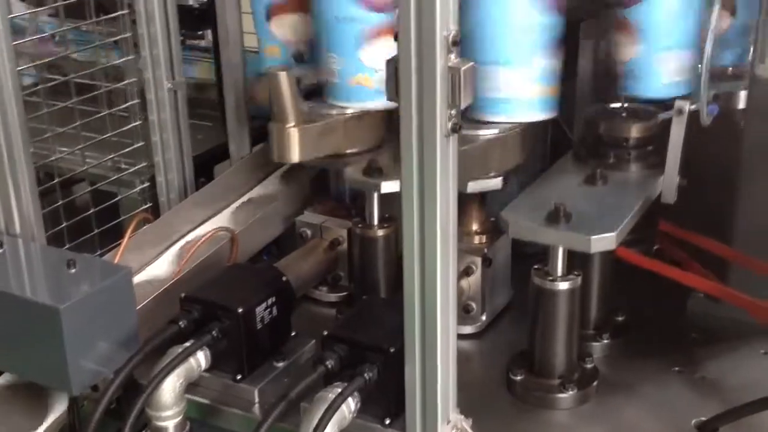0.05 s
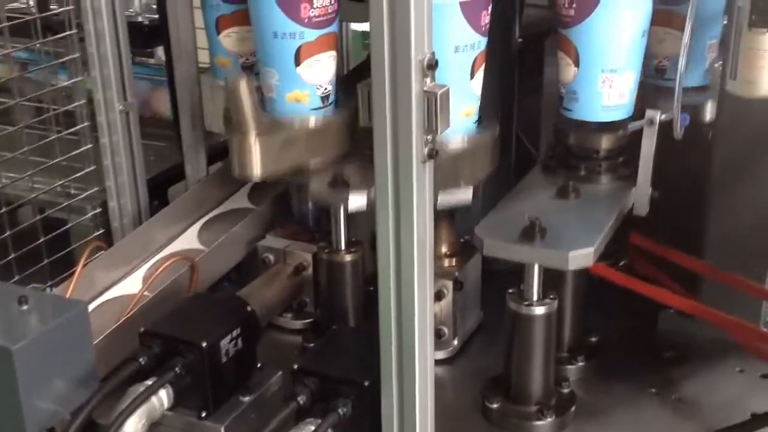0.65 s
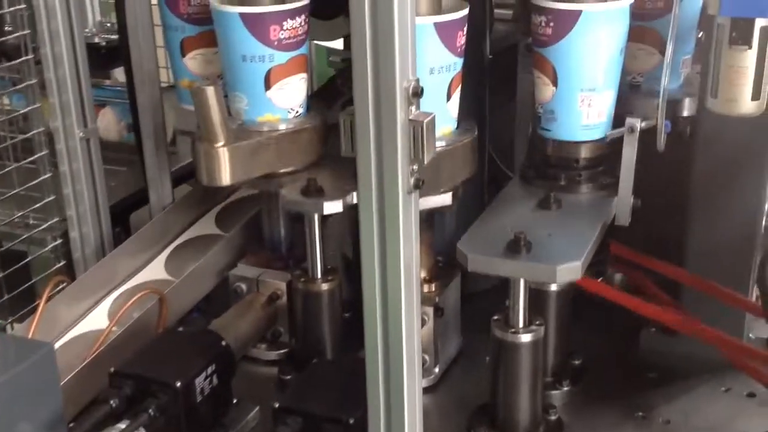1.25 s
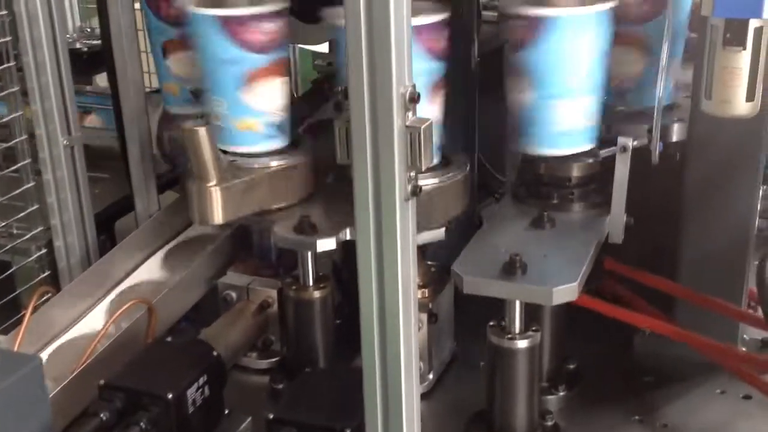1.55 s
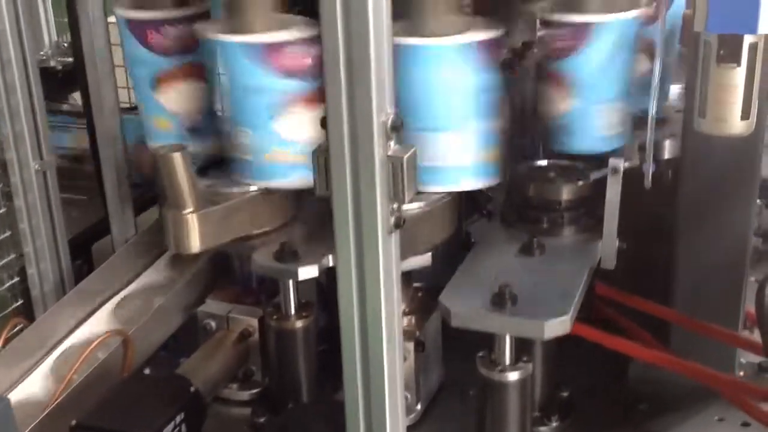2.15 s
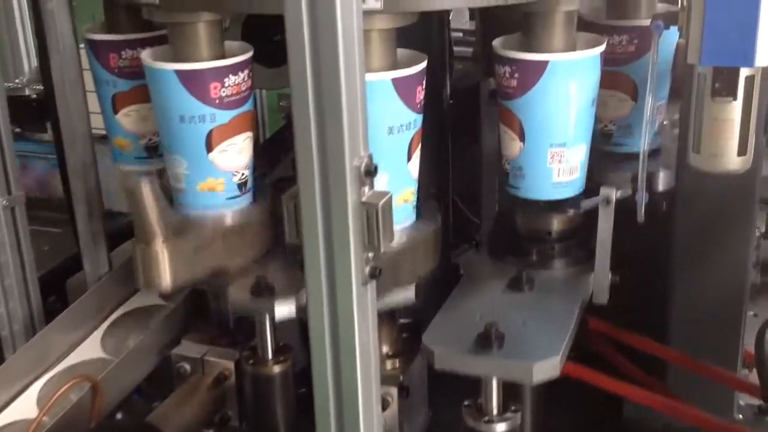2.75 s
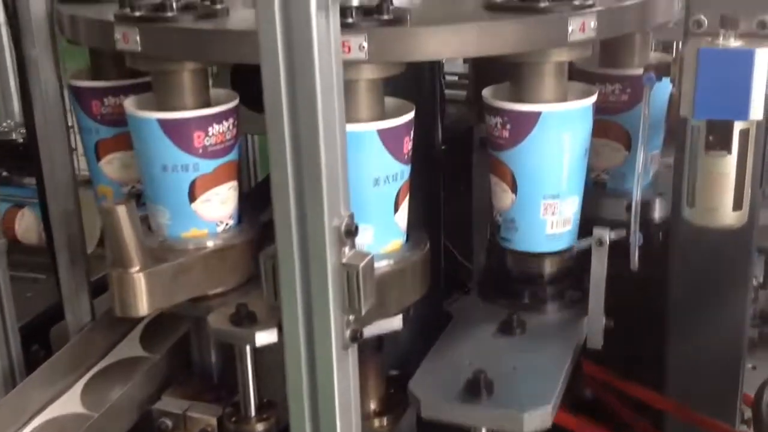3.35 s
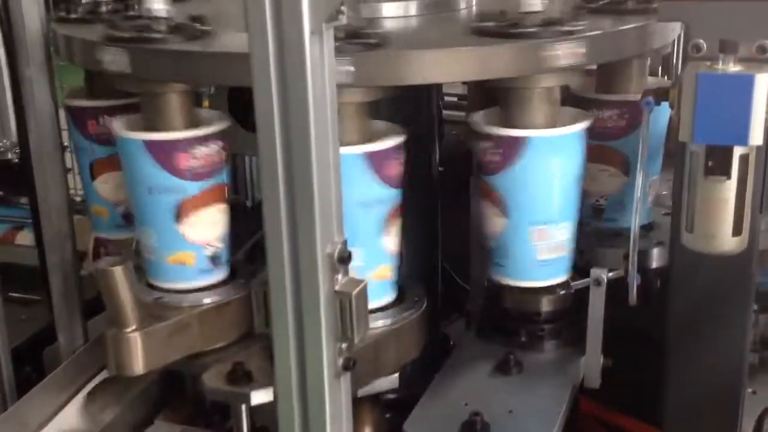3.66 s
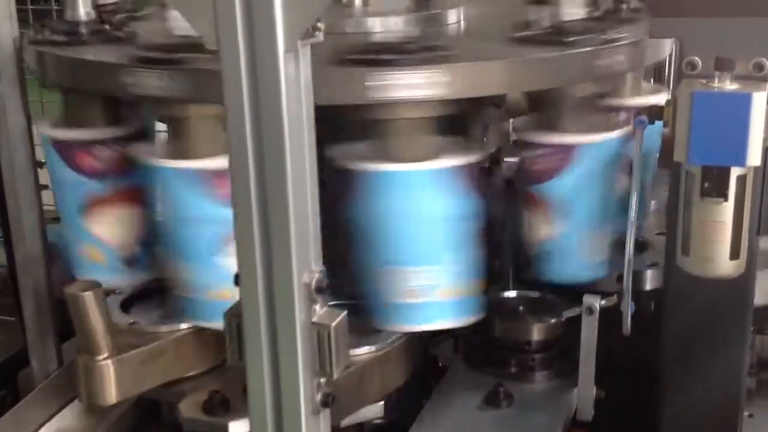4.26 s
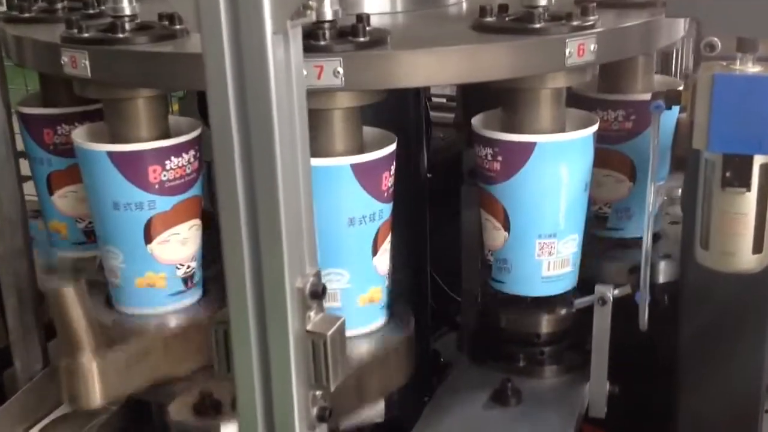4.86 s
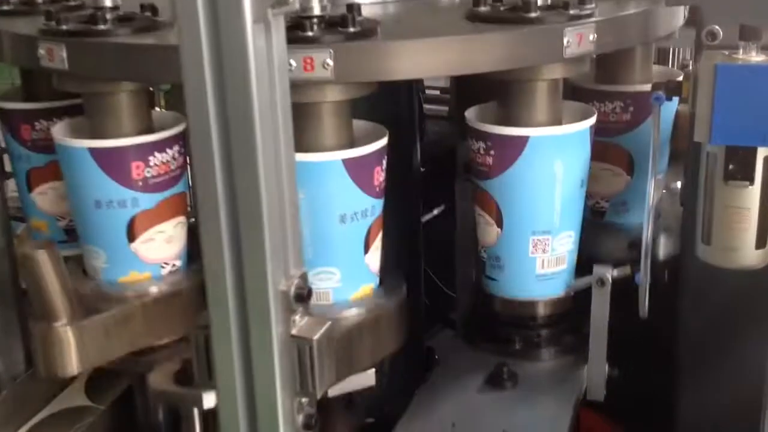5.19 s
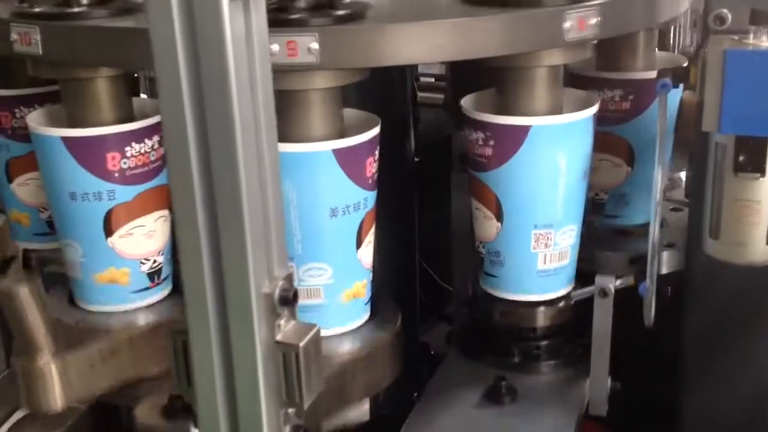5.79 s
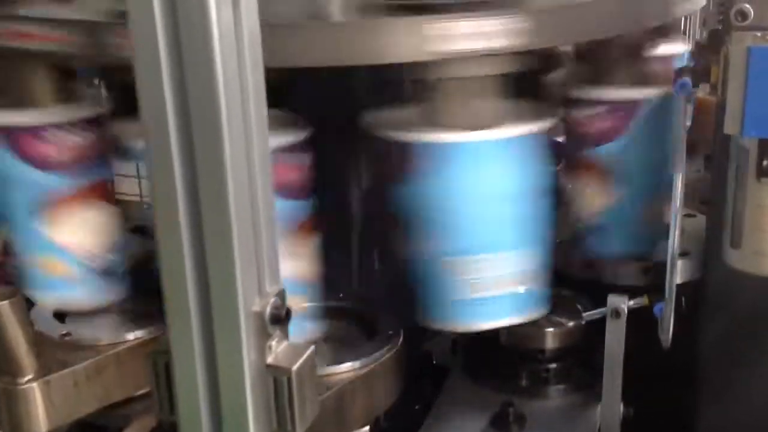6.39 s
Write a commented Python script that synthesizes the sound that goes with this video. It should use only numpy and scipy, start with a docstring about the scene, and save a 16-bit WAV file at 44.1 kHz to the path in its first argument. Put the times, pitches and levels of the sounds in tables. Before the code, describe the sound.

A paper cup forming machine runs close by for about six and a half seconds, heard in mono. The loudest sound is a piercing, extremely high squeal from its ultrasonic welder. It is sounding at the start, returns at about 0.6 seconds and repeats every 0.7 seconds, the last at 6.2. Each squeal starts sharply, holds for about a fifth of a second and rings away, pushing the other sounds down while it lasts. In every cycle a steel clamp strikes, an air jet hisses and fades, cams clack in quick clusters and a spinning tool briefly scrapes the cup. More knocks and a thinner hiss lead into the next squeal. Underneath, the drive rumbles and rattles continuously, with a faint gear hum and a thin motor whine. Short paper squeaks come now and then, around 0.3, 1.6, 3.7 and 4.4 seconds. The rhythm stays even throughout.

```python
"""A very high squeal rings out over a rumbling, clattering machine that forms paper cups, close by.
The squeal is the ultrasonic welder, which seals a seam with a vibrating metal horn every 0.7 s.
In each cycle the drive rumbles, its motor whines, air jets hiss, cams and clamps strike and a
spinning tool scrapes the cup; now and then paper squeaks. The squeal overloads the recorder,
whose limiter turns the whole clatter down until the squeal has died away. The sound is mono."""
import sys
import numpy as np
from scipy import signal
from scipy.fft import rfft, irfft, next_fast_len
from scipy.io import wavfile
from scipy.ndimage import uniform_filter1d, minimum_filter1d, map_coordinates

SR = 44100
rng = np.random.default_rng(int(sys.argv[2]) if len(sys.argv) > 2 else 0)


def wav_record(signal):
    """Record a signal, one row per channel, as 16-bit PCM in the file named by sys.argv[1]."""
    frames = np.transpose(np.atleast_2d(signal))
    bounded = np.clip(frames, -1, 1)
    # unit amplitude maps onto the largest positive 16-bit level
    quanta = np.round(bounded * 32767).astype(np.int16)
    wavfile.write(sys.argv[1], SR, quanta)


N = 283563
CYCLE_S = 0.6982


def amp(db):
    """Turn decibels into a number to multiply a sound by."""
    return 10 ** (np.asarray(db) / 20)


def unit(x):
    """Scale a sound so that its average strength (rms) is 1."""
    return x / np.sqrt(np.mean(np.abs(x) ** 2) + 1e-20)


def wobble(per_s):
    """A smooth curve that passes through per_s random values each second."""
    points = rng.standard_normal(int(N * per_s / SR) + 4)
    return map_coordinates(points, [np.arange(N) * per_s / SR])


def colour(x, spectrum, resonances=()):
    """Make some pitches of a sound stronger and others weaker, then scale it to strength 1."""
    size = next_fast_len(N + 8192)
    hz = np.fft.rfftfreq(size, 1 / SR)
    points_hz, points_db = np.transpose(spectrum)
    level_db = np.interp(np.log(hz + 1), np.log(points_hz), points_db)
    for pitch_hz, width_hz, boost_db in resonances:
        level_db += boost_db / (1 + (2 * (hz - pitch_hz) / width_hz) ** 2)
    return unit(irfft(rfft(x, size) * amp(level_db), size)[:N])


def pitched_noise(pitch_hz, width_hz, samples):
    """Noise through one resonance: the narrower it is, the more it sounds like a note."""
    pole = np.exp((2j * np.pi * pitch_hz - np.pi * width_hz) / SR)
    ringing = signal.lfilter([1], np.poly([pole, pole]), rng.standard_normal(samples + SR // 8))
    return unit(ringing.real[-samples:])


def add(out, start_s, x):
    """Mix the sound x into out, beginning at start_s."""
    start = round(start_s * SR)
    first, last = max(start, 0), min(start + len(x), N)
    if last > first:
        out[first:last] += x[first - start:last - start]


def current_cycle():
    """The columns of the cycle table, each value held for as long as its cycle lasts."""
    rows = np.array(CYCLES)
    started = np.searchsorted(rows[:, 0], np.arange(N) / SR, side="right")
    return rows[np.maximum(started - 1, 0)].T


def cycle_time():
    """Seconds since the welder last fired."""
    return np.arange(N) / SR - current_cycle()[0]


def cam(opens_s, length_s, ramp_s):
    """A cam is a shaped wheel: once a cycle it moves a part from off (0) to on (1) and back."""
    since_s = (cycle_time() - opens_s) % CYCLE_S
    return np.clip(np.minimum(since_s, length_s - since_s) / ramp_s, 0, 1)


# One row for each machine cycle, which starts as the welder fires. The dB values raise or lower a sound.
# start_s, clamp_lag_s, clamp_db, chatter_db, squeal_db, cup_knock_db
CYCLES = [(-.077, .001, -7, 0, 0, -10), (.6215, 0.00081, .5, 1, 0, -5), (1.3196, 0, 1.5, 6, -1, 2),
          (2.0166, .004, 6.5, 3, 0, -5), (2.7151, 0.011, 3.5, 1, -1.5, 5), (3.413, 0, 2, 2, 0, 2),
          (4.1128, 0.00041, -2.5, -3, -0.5, 1), (4.8106, 0.0042, 0, -3, -0.5, -4),
          (5.5113, 0.0013, -2.5, -3, 1, 1.5), (6.2058, 0.0071, 3, 1, 0, -4)]
# The horn's weaker side tones, relative to its squeal: pitch_hz, level_db, width_hz
CHATTER_TONES = [(14572, -22, 16), (14787, -22, 16), (15221, -19, 16), (11208, -29, 260)]


def welder(pitch_hz=15005, flat_hz=55, settle_s=0.05, weld_db=2.5, attack_s=0.0024, weld_s=0.18,
           drop_db=8, drop_s=0.06, fade_db_per_s=69):
    """The horn squeals at a fraction of its ultrasonic pitch, starting flat and pulling up to tune."""
    since_s = cycle_time()
    _, _, _, chatter_db, squeal_db, _ = current_cycle()
    # each weld starts with a surge; at its end the squeal drops and rings away
    surge_db = 2.5 * np.exp(-(since_s / 0.063) ** 4)
    after_s = np.maximum(since_s - weld_s, 0)
    fade_db = drop_db * np.minimum(after_s / drop_s, 1) + fade_db_per_s * after_s
    loudness = np.minimum(since_s / attack_s, 1) * amp(weld_db + squeal_db + surge_db - fade_db)
    hz = pitch_hz - flat_hz * np.exp(-since_s / settle_s) + 4 * wobble(25)
    whistle = np.sqrt(2) * np.sin(2 * np.pi * np.cumsum(hz) / SR)
    beating = amp(2.5 * wobble(45))  # reflections make the level waver
    horn = whistle * beating + 0.29 * pitched_noise(pitch_hz, width_hz=100, samples=N)
    # the horn chatters while it is pressed on the paper
    pressed = cam(opens_s=0.047, length_s=0.174, ramp_s=0.034) * amp(chatter_db)
    chatter = sum(amp(level_db + 1.4 * wobble(16)) * pitched_noise(side_hz, width_hz, N)
                  for side_hz, level_db, width_hz in CHATTER_TONES)
    return loudness * (horn + pressed * chatter)


def drive_load(swing_db=2, peak_s=0.69):
    """How hard the drive works, in dB: it swings once a cycle and peaks as the press closes."""
    return swing_db * np.cos(2 * np.pi * (cycle_time() - peak_s) / CYCLE_S)


def contacts(per_s, spread_db=3):
    """A dense hail of tiny taps of uneven size."""
    happens = rng.random(N) < per_s / SR
    size = amp(spread_db * rng.standard_normal(N))
    return happens * size * rng.choice([-1, 1], N)


def steel_parts(taps_per_s, ring_s, parts):
    """Loose steel parts ring at every tap, each in its own way, fading by 60 dB in ring_s."""
    t = np.arange(SR // 10) / SR
    rings = rng.standard_normal((parts, len(t))) * amp(-60 * t / ring_s)
    return sum(signal.fftconvolve(contacts(taps_per_s), ring)[:N] for ring in rings)


# Pitches at which the machine's frame resonates: pitch_hz, width_hz, boost_db
FRAME_RESONANCES = [(179, 84, 3.5), (239, 36, 4), (322, 83, 5), (402, 66, 3.5), (464, 34, -1.5),
                    (556, 32, 2.5), (603, 63, 2), (830, 110, 3), (1240, 330, -0.5), (1910, 950, 0.5),
                    (2790, 290, 1)]
# The deep tone of the shaking frame: pitch_hz, relative_db
RUMBLE_SPECTRUM = [(25, -54), (65, -49), (100, -10.5), (135, -11), (175, -1.5), (300, -2), (600, 0),
                   (950, -3.5), (1300, -12.5), (3000, -26), (16000, -70)]
# The bright tone of small rattling parts: pitch_hz, relative_db
RATTLE_SPECTRUM = [(100, -36), (600, -5), (1200, 0), (2200, .5), (3500, -1), (6500, -0.5), (8000, -4.5),
                   (11000, -9), (14000, -13.5), (15300, -3), (15800, -45)]


def drive(rumble_db=-25, rattle_db=-20, links_per_s=30, link_db=1):
    """Cams, chains and gears shake the frame: it rumbles with the load while small parts rattle."""
    load_db = drive_load()
    # chain links drop onto their toothed wheel, so the rumble pulses
    pulse_db = link_db * np.cos(2 * np.pi * links_per_s * cycle_time())
    rumble = colour(contacts(per_s=2500), RUMBLE_SPECTRUM, FRAME_RESONANCES)
    rumble *= amp(rumble_db + load_db + pulse_db + 0.78 * wobble(22))
    loose_parts = steel_parts(taps_per_s=500, ring_s=0.042, parts=6)
    rattle = colour(loose_parts, RATTLE_SPECTRUM, FRAME_RESONANCES)
    rattle *= amp(rattle_db + 0.071 * load_db + 0.5 * wobble(70))
    return rumble + rattle


def tone(pitch_hz, wander_hz, flutter_db):
    """A pure note of strength 1, slightly unsteady in pitch and level."""
    turns = np.cumsum(pitch_hz + wander_hz * wobble(14)) / SR
    return unit(np.sin(2 * np.pi * turns) * amp(flutter_db * wobble(18)))


# How the motor's whine rises and falls in level: time_s, relative_db
WHINE_LEVELS = [(0.27, -28), (0.51, -29), (0.97, -29), (1.21, -25.5), (1.67, -32), (1.91, -37),
                (2.369, -42), (2.61, -32.8), (3.069, -27), (3.31, -27), (3.76, -30), (4.0, -28.5),
                (4.46, -35), (4.7, -36), (5.16, -36), (5.4, -29), (5.86, -34.3), (6.101, -29.7)]
# The notes of gear teeth meeting, at middle load: pitch_hz, level_db
GEAR_TONES = [(495, -34), (990, -40), (522, -39)]


def motors(whine_hz=4117, whine_boost_db=0.5, load_follow=0.99):
    """The motor's power supply (an inverter) whines, and the hum of the gears swells with the load."""
    whine_db = np.interp(np.arange(N) / SR, *np.transpose(WHINE_LEVELS)) + whine_boost_db
    whine = amp(whine_db) * tone(whine_hz, wander_hz=3.9, flutter_db=2)
    gears = sum(amp(level_db) * tone(pitch_hz, wander_hz=2.97, flutter_db=4)
                for pitch_hz, level_db in GEAR_TONES)
    return whine + amp(load_follow * drive_load()) * gears


# The broad hiss of the blow-off jet: pitch_hz, relative_db
BLOW_OFF_SPECTRUM = [(200, -55), (1500, -0.5), (3500, 0), (5500, 3.5), (7200, 3.5), (9000, -3), (13000, 2),
                     (15000, 2), (15700, -45)]
# The thinner hiss of the transfer jet and the leak: pitch_hz, relative_db
TRANSFER_SPECTRUM = [(500, -34), (4000, -8), (7500, 3.5), (9900, -1), (10500, -7.5), (15000, -10),
                     (15800, -50)]


def air_jets(blow_db=-14, opens_s=0.19, ramp_s=0.039, sag_db_per_s=55, transfer_db=-26, leak_db=-38):
    """Two air valves open in turn over a steady leak; the blow-off jet fades as its pressure sags."""
    since_s = (cycle_time() - opens_s) % CYCLE_S
    sag_db = sag_db_per_s * np.maximum(since_s - ramp_s, 0)
    pressure = amp(blow_db - sag_db + 2 * wobble(60))
    blow_valve = cam(opens_s, length_s=0.29, ramp_s=ramp_s)
    blow_off = colour(rng.standard_normal(N), BLOW_OFF_SPECTRUM) * blow_valve * pressure
    transfer_valve = cam(opens_s=0.506, length_s=0.22, ramp_s=0.03)
    thin_hiss = colour(rng.standard_normal(N), TRANSFER_SPECTRUM)
    return blow_off + thin_hiss * (amp(transfer_db) * transfer_valve + amp(leak_db))


# The tone of steel hitting steel: pitch_hz, relative_db
CLASH_SPECTRUM = [(100, -26), (500, -3.5), (1500, -1), (2800, 1.5), (4500, -2.5), (7000, 3.5), (10000, -25),
                  (15000, -16), (15800, -50)]
# The blows in every cycle, timed from its start. A ring fades by 60 dB in ring_s.
# offset_s, clash_db, cutoff_hz, thud_db, ring_hz, ring_db, ring_s
BLOWS = [(.045, -30, 4070, -26, 803, -19, .1), (.058, -6, 4030, -22, 4390, -9, .05),
         (.059, -18, 3000, -32, 2720, -13, .06), (.073, -13.5, 15000, -33, 6570, -9.5, 0.098),
         (.079, -19.5, 15000, -31, 5816, -8, 0.28), (.08, -34, 9000, -36, 382, -19.5, 0.28),
         (.133, -16.5, 4000, -23, 538, -21, .09), (.191, -21, 5000, -17.5, 218.5, -19, 0.16),
         (.208, -14, 12000, -24, 3470, -19, .08), (.228, -14, 12000, -28, 4750, -22.5, .11),
         (.254, -12, 9100, -27, 1760, -22, 0.13), (.262, -18.5, 9000, -32, 2795, -23.5, 0.26),
         (.298, -19, 9000, -28, 1056, -23, 0.099), (.307, -21, 5000, -25, 664, -20, .13),
         (.325, -23, 9000, -30, 1855, -24.5, 0.2), (.449, -26, 5000, -29, 980, -31, 0.12),
         (0.575, -12.5, 2790, -25, 963.7, -38, .17), (.596, -15, 3504, -26.5, 324, -25, 0.17),
         (.668, -13, 8000, -29, 814, -22, 0.15), (.682, -16.5, 7980, -26, 3480, -21.5, 0.084)]


def cams_and_clamps(alike=0.44, attack_s=0.00098, fade_s=0.11, vary_db=1.13, jitter_s=0.0012):
    """Each part strikes once a cycle: a steel clash, a thud of the frame and the part's own ring."""
    out, t = np.zeros(N), np.arange(SR // 3) / SR
    steel = steel_parts(taps_per_s=3000, ring_s=0.018, parts=3)
    clashes = colour(steel, CLASH_SPECTRUM, FRAME_RESONANCES)
    thuds = colour(rng.standard_normal(N), RUMBLE_SPECTRUM, FRAME_RESONANCES)
    rise = 1 - np.exp(-t / attack_s)
    fade = amp(-60 * t / fade_s)  # the frame damps every blow alike
    for offset_s, clash_db, cutoff_hz, thud_db, ring_hz, ring_db, ring_s in BLOWS:
        dulling = signal.butter(3, cutoff_hz, fs=SR)  # softer contacts are duller

        def strike():
            """One fresh hit of this part."""
            at = rng.integers(N - len(t))
            clash = amp(clash_db) * signal.lfilter(*dulling, clashes[at:at + len(t)])
            thud = amp(thud_db) * thuds[at:at + len(t)]
            ring = pitched_noise(ring_hz, 0.069 * ring_hz, len(t)) * amp(ring_db - 60 * t / ring_s)
            return ((clash + thud) * fade + ring) * rise

        usual = strike()  # the same parts meet in much the same way each time
        # the seam clamp shuts early and chinks just after; later the cup seats with a hollow knock
        clamp_shuts = offset_s < 0.068
        part_of_clamp = offset_s < 0.1
        cup_seats = 0.29 < offset_s < 0.315
        for start_s, clamp_lag_s, clamp_db, _, _, cup_knock_db in CYCLES:
            louder, later = rng.standard_normal(2)
            blow = np.sqrt(alike) * usual + np.sqrt(1 - alike) * strike()
            level_db = clamp_shuts * clamp_db + cup_seats * cup_knock_db + vary_db * louder
            hit_s = start_s + offset_s + part_of_clamp * clamp_lag_s + jitter_s * later
            add(out, hit_s, amp(level_db) * blow)
    return out


# The sharp tone of scraped paper: pitch_hz, relative_db
SCRAPE_SPECTRUM = [(1000, -22), (5000, -7), (6400, -1), (7000, 3.5), (7600, -1.5), (10000, -6.5),
                   (13000, -5.5), (15000, -4), (15700, -45)]


def curling_tool(scrape_db=-14, scrape_s=0.0075, turn_s=0.05256, touch_at_s=0.284, vary_db=2):
    """While its cam holds it against the cup, the spinning tool scrapes the paper once a turn."""
    # the tool spins freely, out of step with the cycle
    from_touch_s = (np.arange(N) / SR - touch_at_s + turn_s / 2) % turn_s - turn_s / 2
    touch = np.exp(-0.5 * (from_touch_s / scrape_s) ** 2)
    held = cam(opens_s=0.28, length_s=0.2, ramp_s=0.055)
    scrape = colour(rng.standard_normal(N), SCRAPE_SPECTRUM)
    return scrape * touch * held * amp(scrape_db + vary_db * wobble(19))


# Squeaks of rubbing paper, and the whistles near 7 kHz of some of the spinning tool's scrapes: peak_s,
# pitch_hz, level_db, half_length_s
SQUEAKS = [(.331, 7000, -16, 0.012), (.85, 6330, -23, .012), (0.885, 2770, -22, 0.016),
           (.916, 1820, -25, .015), (1.571, 4680, -13, 0.02), (1.578, 2760, -21, 0.018),
           (3.65, 5660, -16, 0.021), (4.351, 5470, -18, .018), (4.522, 6940, -24, .025),
           (5.025, 3470, -20, 0.012), (5.191, 6900, -21, .025), (5.777, 1230, -25, 0.0082)]


def paper_squeaks():
    """Paper rubs on the cone that shapes the cup, and some scrapes of the spinning tool whistle; each squeak
    swells and fades at one pitch."""
    out, t = np.zeros(N), np.arange(-SR // 10, SR // 10) / SR
    for peak_s, pitch_hz, level_db, half_length_s in SQUEAKS:
        rub = pitched_noise(pitch_hz, width_hz=0.05 * pitch_hz, samples=len(t))
        swell = np.exp(-0.5 * (t / half_length_s) ** 2)
        add(out, peak_s + t[0], amp(level_db) * rub * swell)
    return out


def scene():
    """The whole machine, the same in the left and right channels."""
    machine = drive() + cams_and_clamps() + curling_tool() + paper_squeaks()
    machine += motors() + air_jets() + welder()
    return np.array([machine, machine])


def limiter(x, ceiling=0.77, hold_s=0.0044, release_db_per_s=150):
    """Loud peaks turn the volume down at once; after a short hold it climbs back."""
    over_db = 20 * np.log10(np.maximum(np.abs(x).max(axis=0) / ceiling, 1))
    span = int(hold_s * SR) | 1  # an odd number of samples
    held_db = -minimum_filter1d(-over_db, span, origin=span // 2)
    climb_db = release_db_per_s * np.arange(N) / SR
    cut_db = np.maximum.accumulate(held_db + climb_db) - climb_db
    smooth_gain_db = uniform_filter1d(minimum_filter1d(-cut_db, size=65), size=65)
    return x * amp(smooth_gain_db)


def record(dry, top_hz=15900):
    """The recorder limits the level and keeps no pitch above top_hz."""
    size = next_fast_len(N + 8192)
    kept = np.fft.rfftfreq(size, 1 / SR) < top_hz
    return irfft(rfft(limiter(dry), size) * kept, size)[:, :N]


dry = scene()
out = record(dry)
wav_record(out)
```